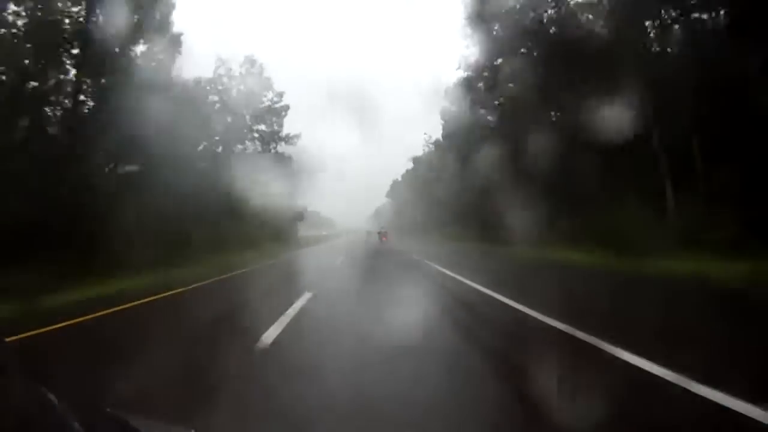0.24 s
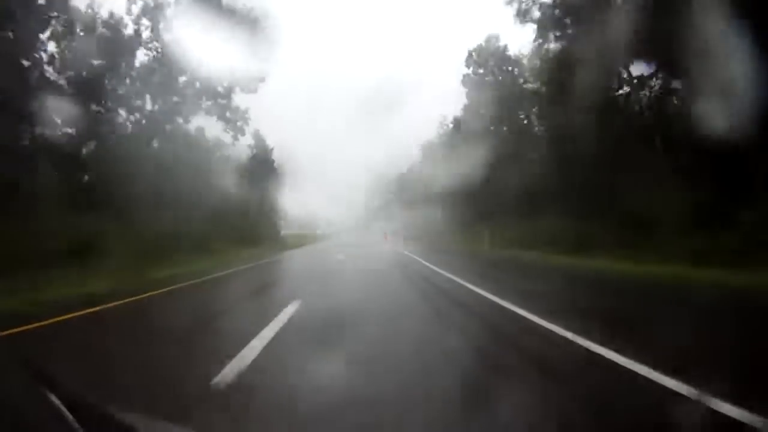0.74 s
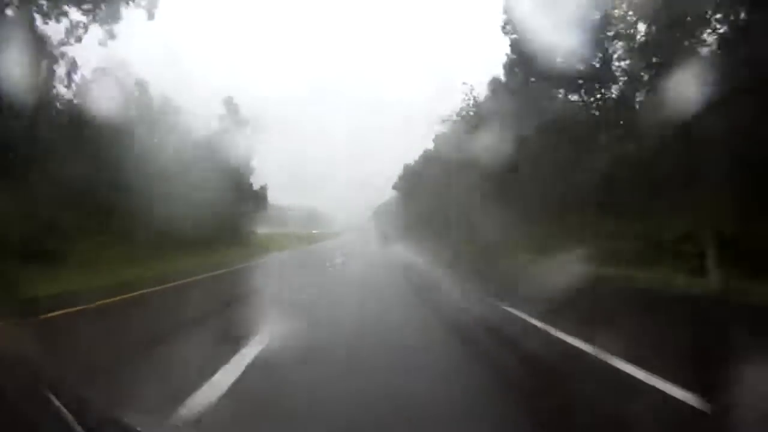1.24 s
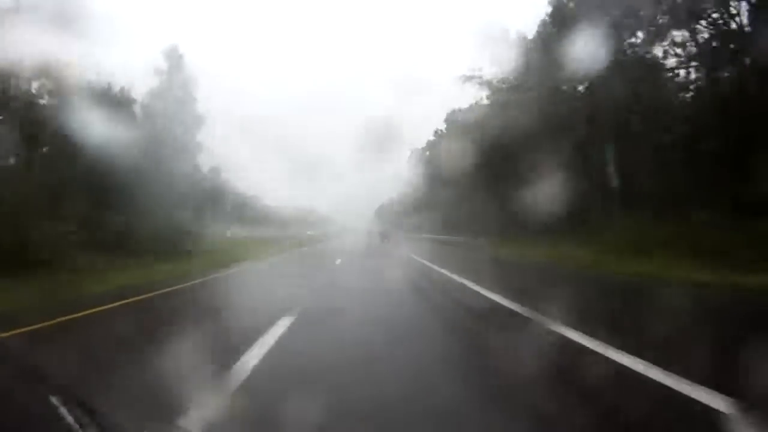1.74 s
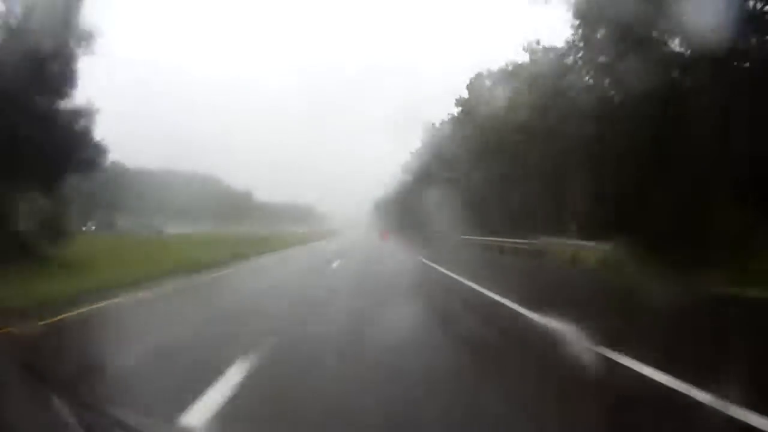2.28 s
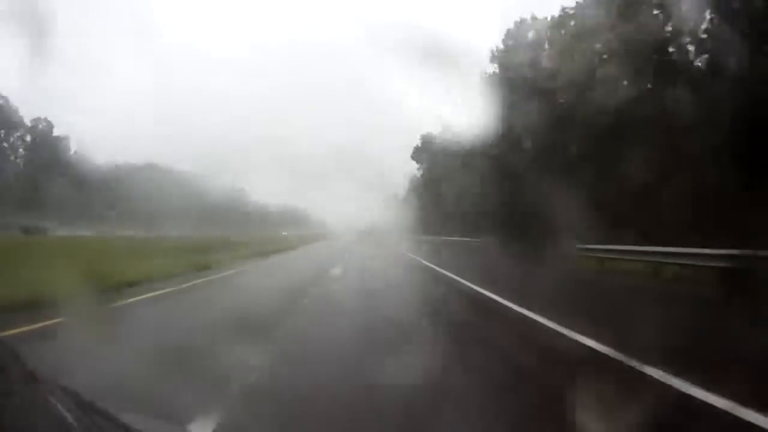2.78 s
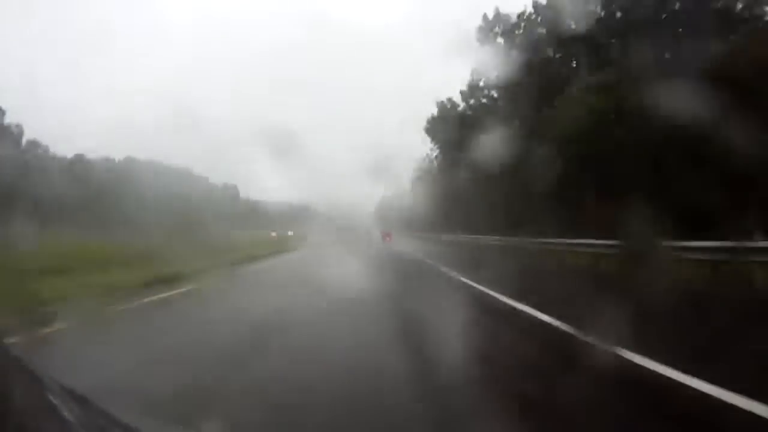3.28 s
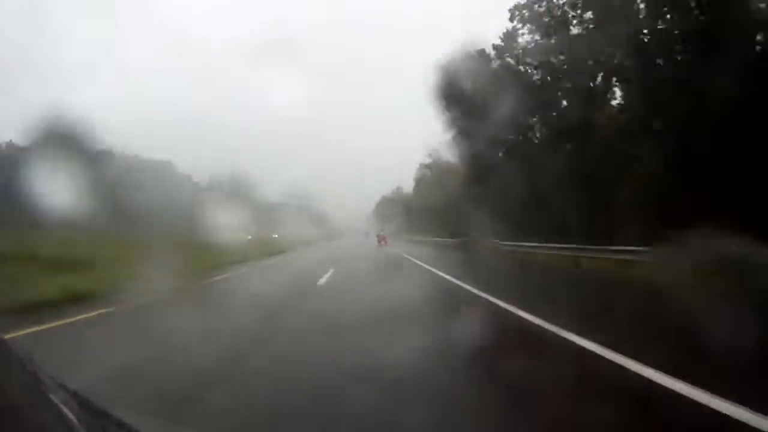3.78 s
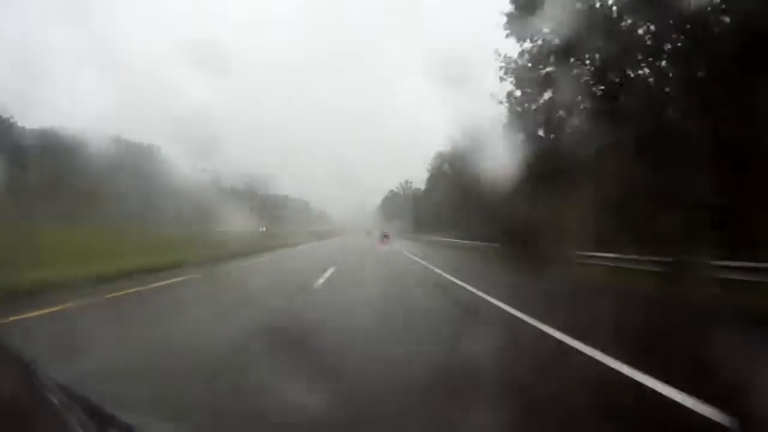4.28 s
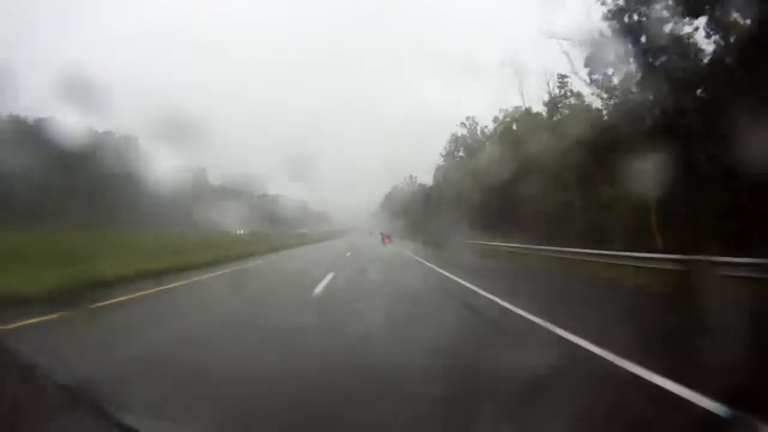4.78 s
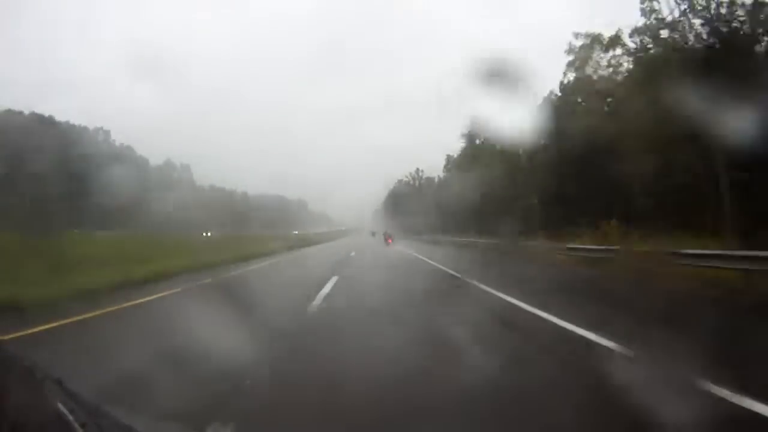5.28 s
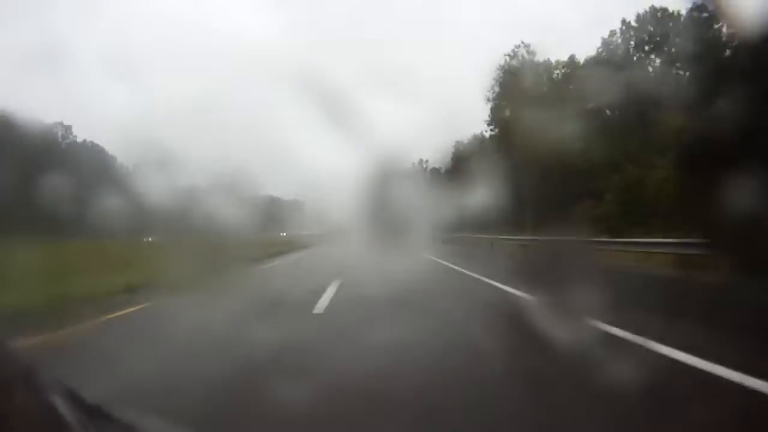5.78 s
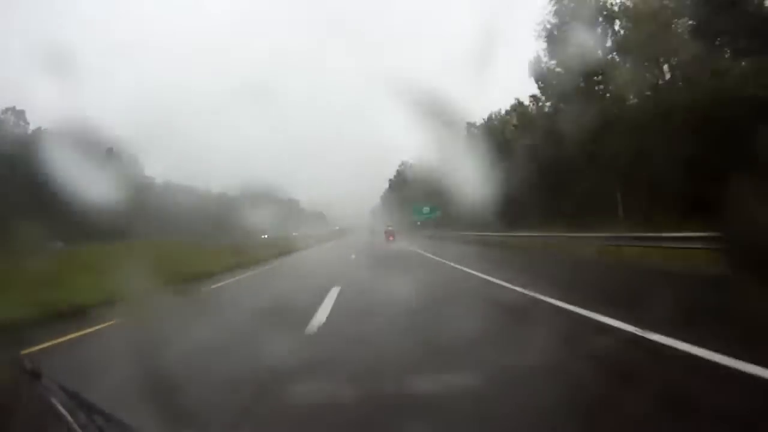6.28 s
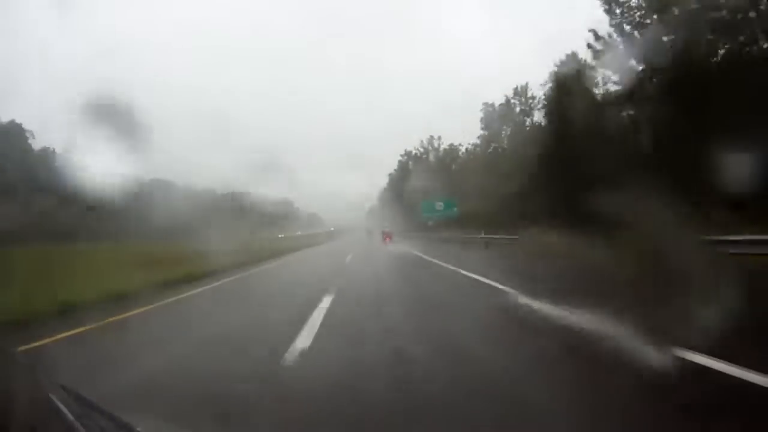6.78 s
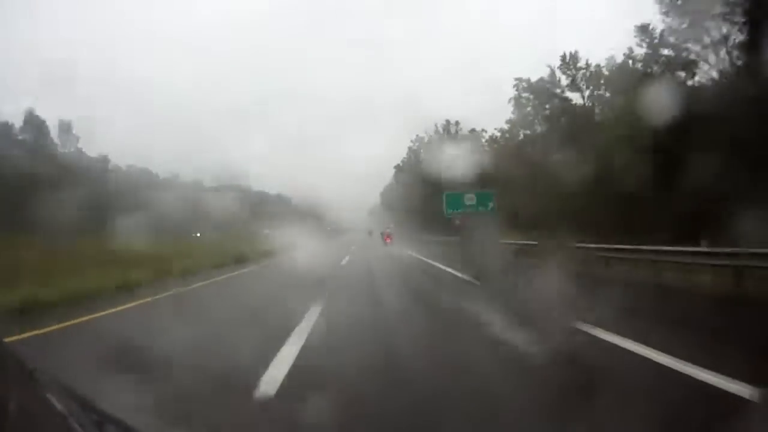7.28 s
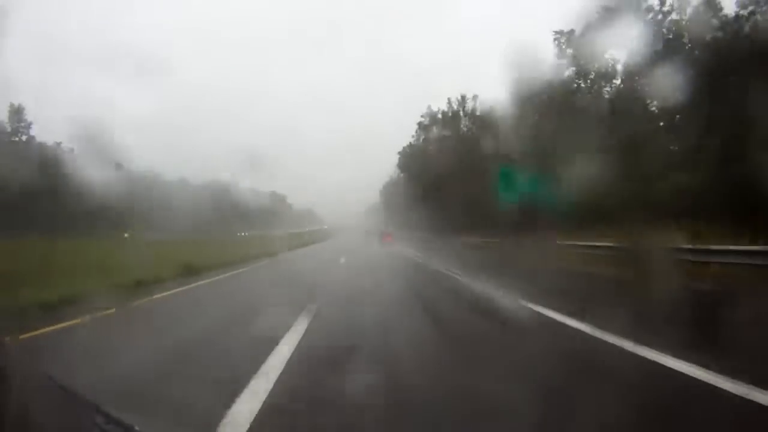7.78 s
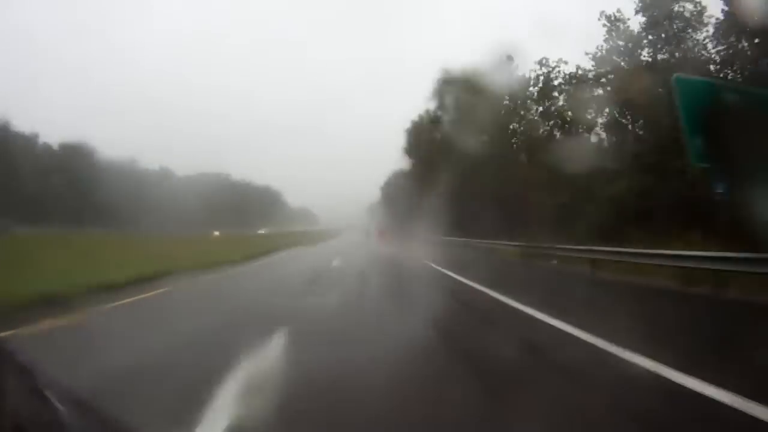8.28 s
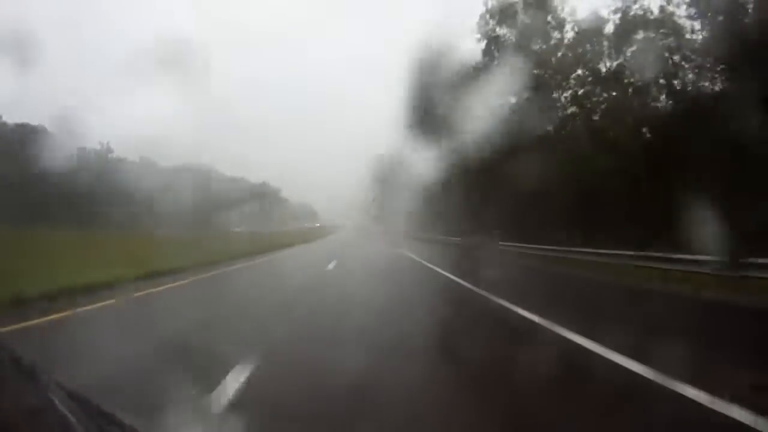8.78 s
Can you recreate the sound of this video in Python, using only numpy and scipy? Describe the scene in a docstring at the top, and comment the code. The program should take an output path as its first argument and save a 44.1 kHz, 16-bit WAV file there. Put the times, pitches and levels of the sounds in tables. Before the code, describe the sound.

A motorcycle cruises along a wet highway, heard from inside a closed plastic camera case. Raindrops strike the case quickly and irregularly throughout, the heavy ones with a hollow, ringing tock and the light ones with a small splash. Behind them, fine spray hisses and ticks, wind rumbles in gusts and the engine drones low and steady, easing slightly near the end.

```python
"""Raindrops tock and splash on a closed plastic camera case, carried by a motorcycle on a wet highway.
Heavy drops make the case ring with a hollow note; light ones mostly splash. Behind them, fine spray
hisses and ticks on the case, wind buffets it and the engine's exhaust drones. The hardest drops
overload the recorder, whose limiter then turns everything down for a moment."""
import sys
import numpy as np
from scipy import signal
from scipy.fft import rfft, irfft
from scipy.io import wavfile

SR = 44100
rng = np.random.default_rng(int(sys.argv[2]) if len(sys.argv) > 2 else 0)


def persist_wave(psi):
    """Save psi, clipped to +-1, as 16-bit WAV."""
    counts = np.round(np.clip(psi, -1, 1) * 32767).astype(np.int16)
    wavfile.write(sys.argv[1], SR, np.atleast_2d(counts).T)


N = 398656


def raindrops(case, light_per_s=11, light_splash_db=15):
    """Heavy drops strike the case, with a random shower of light, splashy ones between them."""
    # Each row: start in seconds, strength in dB, ring pitch in Hz, splash level over the ring in dB.
    heavy_drops = [(0.0335, -7.0, 2130, 7), (0.0723, -7.0, 2310, 8), (0.1446, -6.0, 2250, 1),
                   (0.1791, -3.0, 2120, 0), (0.1944, -5.0, 2180, 2), (0.3067, -0.5, 2140, -2),
                   (0.3149, -5.0, 2300, 0), (0.3817, -6.5, 2190, 12), (0.4153, -5.0, 2170, 3),
                   (0.4466, -6.0, 2240, -1), (0.4925, -1.0, 2020, 11), (0.5542, 7.0, 2100, -3),
                   (0.7202, -0.5, 2190, 0), (0.7734, -2.0, 2210, -4), (0.7858, -5.0, 2290, 0),
                   (0.8787, -8.5, 2170, 12), (0.9151, -4.5, 2240, 4), (0.9515, -6.0, 2210, 0),
                   (0.9937, -3.5, 2300, 12), (1.06, -4.5, 2020, 12), (1.1143, -7.5, 2110, 12),
                   (1.1598, 3.5, 2180, -7), (1.28, 2.5, 2270, 1), (1.3633, -9.0, 2170, 0),
                   (1.4918, -1.0, 2230, 5), (1.5727, -4.0, 2140, 2), (1.5967, -5.5, 2130, 3),
                   (1.737, 1.0, 2270, -2), (1.8775, 3.5, 2270, 2), (1.8979, 5.5, 2160, -3),
                   (1.9406, -5.0, 2220, 6), (2.0142, -4.5, 2260, 2), (2.0924, -4.5, 2290, 5),
                   (2.1906, -5.0, 2140, -2), (2.2051, -4.0, 2330, 0), (2.2493, -5.0, 2280, 3),
                   (2.2644, -7.0, 2320, 9), (2.2892, -6.5, 2240, 12), (2.3061, -2.5, 2130, -1),
                   (2.3873, -5.5, 2190, 1), (2.5323, -5.0, 2240, 2), (2.5769, 8.0, 2110, -5),
                   (2.6814, -3.0, 2190, 6), (2.7139, -4.0, 2170, 12), (2.7422, -1.5, 2260, 0),
                   (2.7758, -5.0, 2240, 6), (2.8202, -5.0, 2300, 7), (2.8365, -4.5, 2300, -2),
                   (2.9335, -5.5, 2210, 6), (2.9931, -6.5, 2410, 12), (3.0682, -1.5, 2300, 0),
                   (3.0907, 5.0, 2280, 2), (3.2235, -6.0, 2190, 10), (3.2522, -6.5, 2090, 0),
                   (3.3159, -7.5, 2380, 12), (3.4061, -4.5, 2300, -1), (3.6126, 7.5, 2110, -4),
                   (3.792, -4.5, 2470, 12), (3.8195, 3.5, 2280, 3), (4.0111, 6.5, 2260, 5),
                   (4.1056, -1.5, 2130, -3), (4.3357, -4.0, 2320, 12), (4.3456, 3.0, 2110, 0),
                   (4.4902, -4.0, 2480, 12), (4.5073, -1.5, 2350, 4), (4.5447, 0.0, 2120, -3),
                   (4.6483, -5.5, 2140, -1), (4.719, -4.0, 2060, 10), (4.7271, 0.5, 2160, -5),
                   (4.7693, -7.5, 2240, 4), (4.835, -4.0, 2340, 2), (4.8877, -3.5, 2260, 4),
                   (4.95, 8.0, 2150, -3), (4.9871, 1.5, 2150, -4), (5.0204, -4.0, 2550, 10),
                   (5.1844, -5.0, 2140, 2), (5.2485, -4.5, 2120, 4), (5.2827, 1.5, 2310, 0),
                   (5.3392, 0.0, 2300, -2), (5.5524, 6.0, 2280, 3), (5.6367, -3.0, 2140, -1),
                   (5.6961, -3.0, 2300, 0), (5.8103, 8.5, 2140, -4), (5.874, 2.0, 2150, 9),
                   (5.9329, -2.5, 2300, 1), (5.975, -7.0, 2140, -2), (6.0306, -3.5, 2250, 12),
                   (6.0947, -5.0, 2300, 9), (6.1173, -5.5, 2110, 11), (6.1315, -5.5, 2260, 3),
                   (6.1422, -4.0, 2310, 3), (6.218, -3.0, 2140, -4), (6.2553, -6.5, 2280, 7),
                   (6.4192, -6.0, 2100, 9), (6.4288, 0.0, 2320, 1), (6.4956, -6.0, 2170, 8),
                   (6.5092, -0.5, 2120, 4), (6.5455, 9.0, 2150, -7), (6.6146, 2.5, 2290, -1),
                   (6.7651, -4.0, 2230, 0), (6.8263, -5.5, 2480, 10), (6.9649, -2.5, 2290, 7),
                   (7.0243, -6.0, 2240, 12), (7.0317, -5.0, 2110, 12), (7.1141, 5.0, 2300, 0),
                   (7.1626, -2.0, 2340, 9), (7.19, 4.0, 2160, -7), (7.2839, -0.5, 2120, -3),
                   (7.3825, -5.5, 2110, 0), (7.4222, -2.5, 2120, 11), (7.4567, -7.0, 2180, 12),
                   (7.5716, -1.0, 2050, 6), (7.6131, 0.0, 2170, -3), (7.7011, -7.5, 2240, 9),
                   (7.7343, -6.0, 2340, 12), (7.7531, 5.5, 2290, 3), (7.7921, -4.5, 2140, 3),
                   (7.8127, -5.5, 2100, 10), (7.9086, -7.5, 2080, 7), (7.9607, -5.5, 2110, 12),
                   (7.9846, -4.0, 2250, 9), (8.0669, -7.0, 2310, 8), (8.19, -4.0, 2270, 3),
                   (8.2038, 0.5, 2280, 2), (8.2661, -7.0, 2120, 2), (8.3171, -6.5, 2150, -1),
                   (8.3578, -1.0, 2140, 3), (8.4322, -5.0, 2200, -1), (8.5193, 0.5, 2310, -1),
                   (8.5378, -1.0, 2180, -6), (8.6925, 8.5, 2120, -4), (8.8468, 1.0, 2160, -4),
                   (8.9446, -3.0, 2110, 2), (8.9768, -4.0, 2300, -2), (9.0038, -2.5, 2290, 3)]
    rain = np.zeros(N)
    for start, db, hz, splash_db in heavy_drops:
        add(rain, start, drop(case, db, hz, splash_db))
    for when, weight, water in rng.random((round(light_per_s * N / SR), 3)):
        db = -15 + 7 * weight
        hz = 2200 + 110 * (2 * water - 1)  # water on the case shifts its pitch
        add(rain, when * N / SR, drop(case, db, hz, light_splash_db))
    return rain


def drop(case, db, hz, splash_db, crackle_db=5, knock_hz=1070, knock_width_hz=2100, size=600):
    """One drop rings the case's main note, and its splash knocks the wall and stirs the other notes."""
    t = np.arange(size) / SR
    contact_s = 0.0034 * amp(db) ** 0.068  # big drops push for longer
    push = water_force(t, contact_s)
    burst = water_force(t, 0.77 * contact_s)  # the splash is over sooner
    ring = evened(push * np.sin(2 * np.pi * hz * t))
    ping = evened(push * np.sin(2 * np.pi * 1.66 * hz * t))  # a higher note of the case
    fragments = burst * rng.standard_normal(size) * amp(crackle_db * rng.standard_normal(size))
    wall = np.exp(-np.pi * knock_width_hz * t) * np.sin(2 * np.pi * knock_hz * t)
    crack = evened(signal.fftconvolve(fragments, case)[:size])
    knock = evened(signal.fftconvolve(fragments, wall)[:size])
    knock_db = -17 + 0.96 * db  # heavy drops knock harder
    splash = evened(crack + amp(-10) * ping + amp(knock_db) * knock)
    return amp(db) * evened(ring + amp(splash_db) * splash) / evened(push).max()


def water_force(t, seconds):
    """Landing water pushes with a quick rise and a rounded end."""
    return np.sqrt(t / seconds) * np.exp(-(t / seconds) ** 2)


def case_response(size=2048):
    """How the plastic case rings after one tiny tap."""
    # What the walls let through. Each row: frequency in Hz, level in dB.
    wall_colour = [(400, -17), (750, -8.5), (1500, -2), (2600, 3), (3500, -1), (4200, -6), (5200, -3),
                   (6000, -16), (6800, -1.5), (9500, -11), (11600, -27), (12700, -45), (14600, -20),
                   (16000, -7.5)]
    # The notes the case rings at. Each row: pitch in Hz, width in Hz, boost in dB.
    resonances = [(760, 140, 2.5), (1170, 200, 4.5), (2130, 320, 9.5), (2950, 300, 2), (3690, 280, 6),
                  (8350, 300, 9), (9870, 380, 12), (14140, 420, 15), (14930, 350, 6)]
    hz = abs(np.fft.fftfreq(size, 1 / SR))
    peaks_db = sum(boost / (1 + (2 * (hz - pitch) / width) ** 2) for pitch, width, boost in resonances)
    gain = amp(level_at(wall_colour, hz) + peaks_db)
    spectrum = np.exp(signal.hilbert(np.log(gain)).conj())  # puts the ringing after the tap
    return np.fft.ifft(spectrum).real[:size // 2]


def spray(case, level_db, per_s=130, spread_db=5, flutter_db=3.36):
    """Fine droplets patter faintly on the case, over the hiss of mist and wet tyres."""
    # The tone of the hiss. Each row: frequency in Hz, level in dB.
    hiss_colour = [(300, 16.5), (1200, 7.5), (2100, 6.5), (4000, -1.5), (14000, 1)]
    sizes = droplet_hits(per_s, spread_db, cap=3)
    bursts = np.sqrt(np.convolve(sizes ** 2, np.hanning(70), "same"))
    patter = evened(bursts * rng.standard_normal(N))
    flutter = amp(flutter_db * drift(37))
    hiss = evened(coloured(flutter * rng.standard_normal(N), hiss_colour))
    wash = amp(-4) * patter + amp(-1) * hiss
    return amp(level_db) * signal.oaconvolve(wash, case / np.linalg.norm(case))[:N]


def ticks(case, per_s=20, spread_db=3.5, tick_s=0.001, low_cut_hz=3000):
    """Small fast droplets snap on the case, too briefly to stir its low notes."""
    sizes = droplet_hits(per_s, spread_db, cap=2)
    snaps = np.sqrt(lag(sizes ** 2, tick_s / 2)) * rng.standard_normal(N)
    bright = snaps - lag(snaps, 1 / (2 * np.pi * low_cut_hz))
    return evened(signal.oaconvolve(bright, case)[:N])


def droplet_hits(per_s, spread_db, cap):
    """Droplets land at random, one spike each: most are small, a few are bigger."""
    sizes = amp(spread_db * np.minimum(rng.exponential(1, N), cap))
    return sizes * (rng.random(N) < per_s / SR)


def wind(level_db, lumps_db=2.5):
    """Swirls of air buffet the case with a low, lumpy rumble."""
    # The tone of the rumble. Each row: frequency in Hz, level in dB.
    rumble_colour = [(8, -6), (19, 2.5), (38, 7), (52, -3.5), (76, -6), (91, 3), (106, -8.5), (135, -7),
                     (200, -25), (500, -38.5)]
    rumble = coloured(rng.standard_normal(N), rumble_colour)
    lumps = amp(lumps_db * drift(4.2))
    return amp(level_db) * evened(rumble * lumps)


def engine(wind_db, level_db=-28, waver_db=3.5, gust_share=0.41):
    """Uneven firing makes tones at multiples of the cycle rate; they waver and swell with the wind."""
    # Engine speed, easing near the end. Each row: time in seconds, four-stroke cycles per second.
    speed = [(0, 18.05), (1.2, 18.17), (2.4, 18.41), (4.2, 18.6), (7.5, 18.56), (8, 17.85), (9, 17.76)]
    # The exhaust's tones. Each row: multiple of the cycle rate, relative level in dB.
    exhaust_tones = [(1, -15), (2, -9.5), (4, -47), (5, -3), (6, -7), (7, -6.5), (9, -15.5), (11, -25)]
    cycles = np.cumsum(over_time(speed)) / SR
    drone = np.zeros(N)
    for multiple, db in exhaust_tones:
        strength = amp(db + waver_db * drift(8))
        drone += strength * np.cos(2 * np.pi * (round(multiple) * cycles + rng.random()))
    swell_db = gust_share * (wind_db - wind_db.mean())
    return amp(level_db + swell_db) * evened(drone)


def limiter(x, threshold_db=-6, sense_s=0.0015, attack_s=0.0025, recovery_db_per_s=74):
    """Turns loud sound down, too late for a drop's first instant, then slowly back up."""
    level_db = 10 * np.log10(lag(x ** 2, sense_s) + 1e-12)
    over_db = np.maximum(level_db - threshold_db, 0)
    recovery_db = np.arange(N) / SR * recovery_db_per_s
    cut_db = np.maximum.accumulate(over_db + recovery_db) - recovery_db
    return x / amp(lag(cut_db, attack_s))


def amp(db):
    """Turns decibels into a number to multiply by."""
    return 10 ** (np.asarray(db) / 20)


def evened(x):
    """Scales x to an average (rms) level of 1."""
    return x / np.sqrt(np.mean(x ** 2) + 1e-20)


def level_at(colour, hz):
    """Looks up the level at hz in rows of frequency and dB."""
    frequencies, db = np.transpose(colour)
    return np.interp(np.log(hz + 1), np.log(frequencies + 1), db)


def coloured(x, colour):
    """Boosts or cuts each frequency of x by the table's dB."""
    return irfft(rfft(x) * amp(level_at(colour, np.fft.rfftfreq(N, 1 / SR))), N)


def over_time(rows):
    """Joins rows of time and value with straight lines."""
    seconds, values = np.transpose(rows)
    return np.interp(np.arange(N) / SR, seconds, values)


def add(mix, start_s, sound):
    """Mixes a sound in at its start time."""
    part = mix[max(round(start_s * SR), 0):][:len(sound)]
    part += sound[:len(part)]


def drift(hz):
    """A random wobble, no faster than about hz."""
    damping = (1 + (np.fft.rfftfreq(N, 1 / SR) / hz) ** 2) ** 2
    return evened(irfft(rfft(rng.standard_normal(N)) / damping, N))


def lag(x, seconds):
    """Smooths x by following it sluggishly."""
    keep = np.exp(-1 / (seconds * SR))
    return signal.lfilter([1 - keep], [1, -keep], x)


def scene():
    """Rain on the case, wind and engine, all at one microphone."""
    # Gusts of wind. Each row: time in seconds, level in dB.
    gusts = [(0.0, -15.5), (0.28, -24.5), (0.42, -20.5), (0.84, -22.5), (1.12, -18.5), (1.4, -23.0),
             (1.54, -18.0), (1.96, -23.5), (2.38, -18.0), (2.8, -24.0), (3.36, -15.5), (3.5, -20.0),
             (4.34, -21.0), (5.04, -24.0), (5.18, -16.5), (5.32, -22.0), (6.44, -20.5), (6.72, -26.0),
             (6.86, -17.5), (7.28, -24.5), (8.4, -18.0), (9.04, -24.5)]
    # Fine spray reaching the case. Each row: time in seconds, level in dB.
    mist = [(0.0, -24.5), (1.4, -27), (1.54, -25.5), (1.96, -24), (2.66, -23), (3.5, -25.5), (3.64, -18.5),
            (3.78, -23.5), (5.18, -24.0), (6.02, -26.5), (6.44, -19.5), (6.58, -26.5), (7.0, -21.5),
            (7.28, -28), (8.4, -21), (8.54, -32.5), (8.82, -25.5), (9.04, -36)]
    case = case_response()
    wind_db, spray_db = over_time(gusts), over_time(mist)
    rain = raindrops(case) + spray(case, spray_db) + amp(spray_db - 6) * ticks(case)
    return (rain + wind(wind_db - 1) + engine(wind_db))[None]


def record(dry):
    """The recorder limits the sound, clips its peaks, colours the treble and cuts the very top."""
    # The recorder's uneven treble. Each row: frequency in Hz, boost or cut in dB.
    treble = [(5200, -0.5), (6200, -3), (7200, -6.5), (10000, 3.5), (11700, -12), (12600, -11),
              (14200, 9.5), (16000, -13.5)]
    clipped = np.clip(limiter(dry[0]), -1, 1)
    top_cut = signal.firwin(255, cutoff=16000, window=("kaiser", 8), fs=SR)
    return signal.oaconvolve(coloured(clipped, treble), top_cut, "same")[None]


dry = scene()
out = record(dry)
persist_wave(out)
```